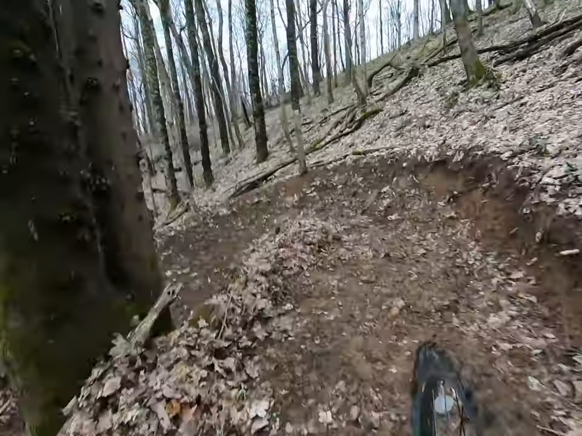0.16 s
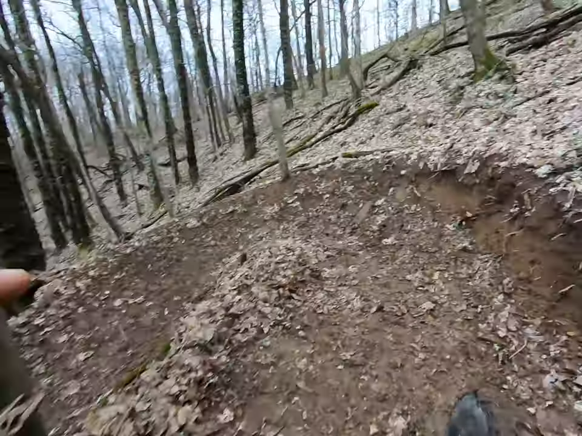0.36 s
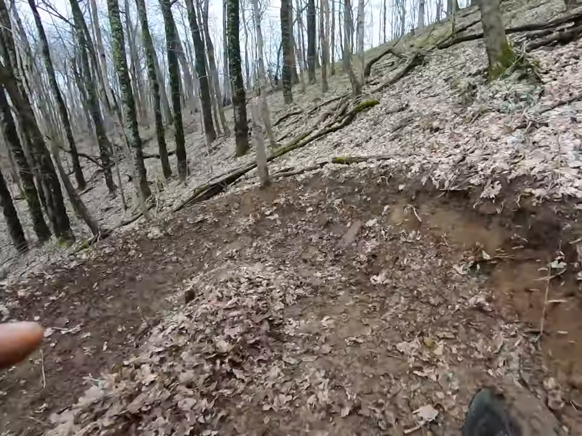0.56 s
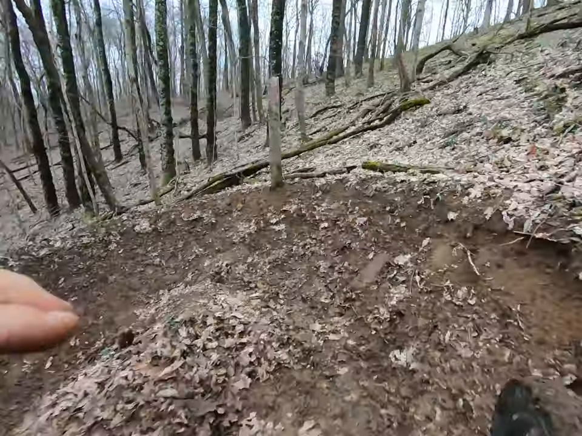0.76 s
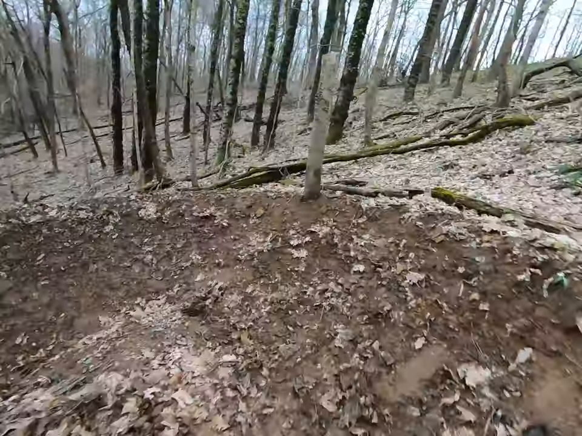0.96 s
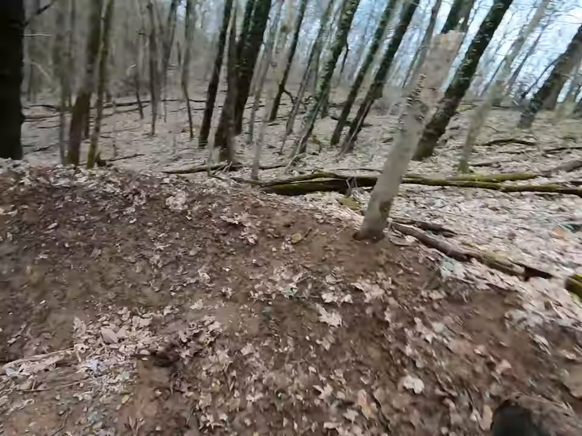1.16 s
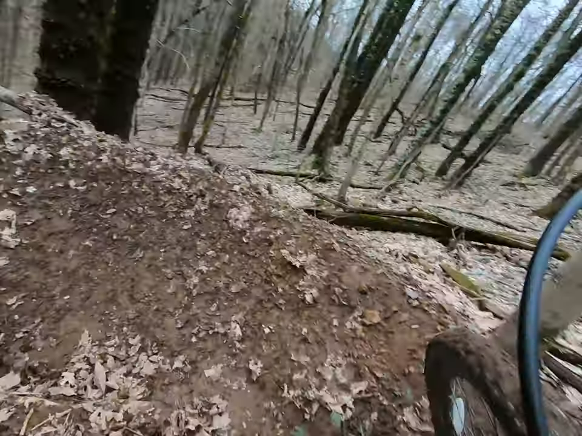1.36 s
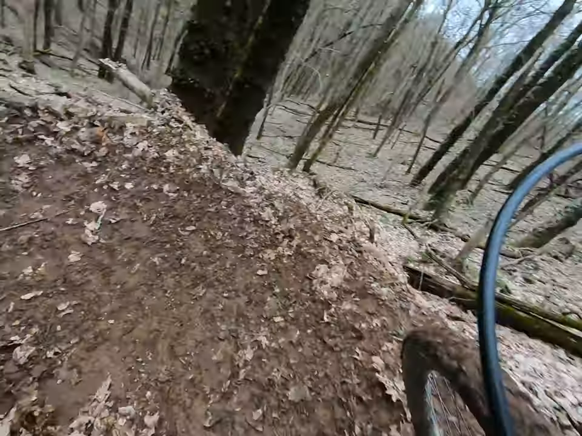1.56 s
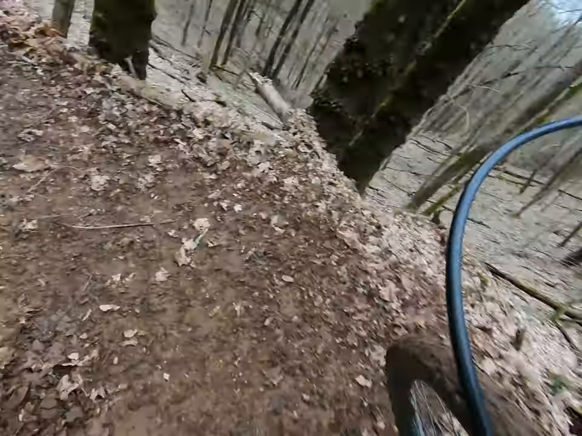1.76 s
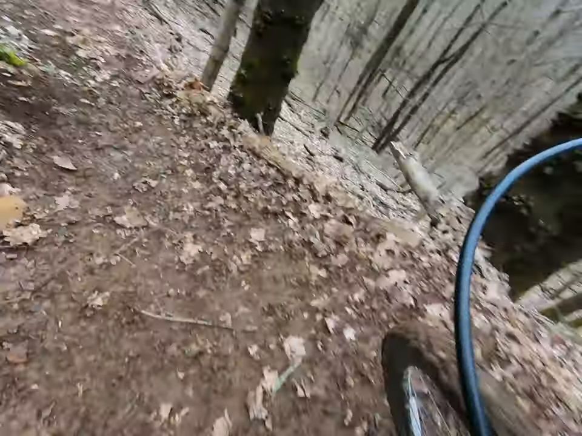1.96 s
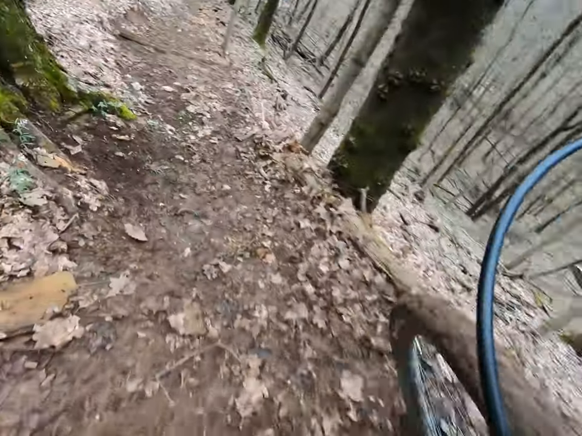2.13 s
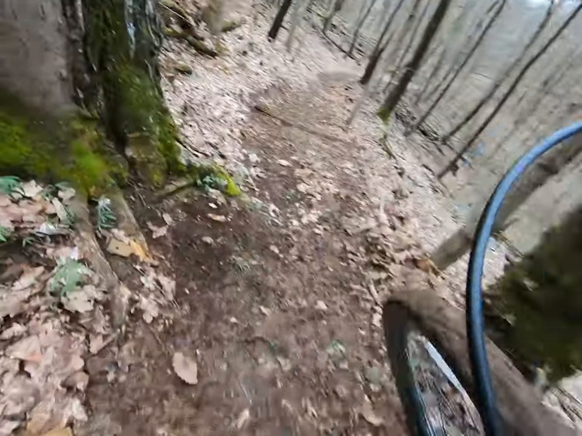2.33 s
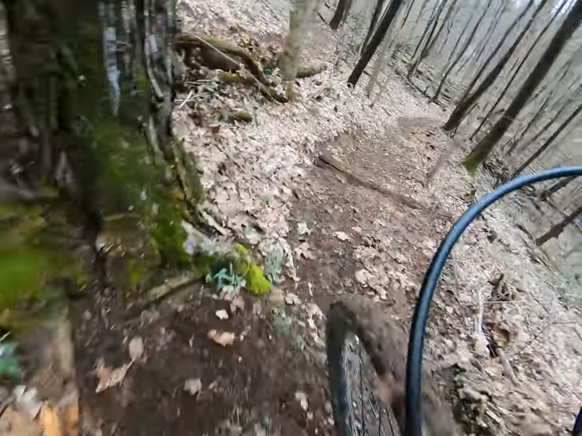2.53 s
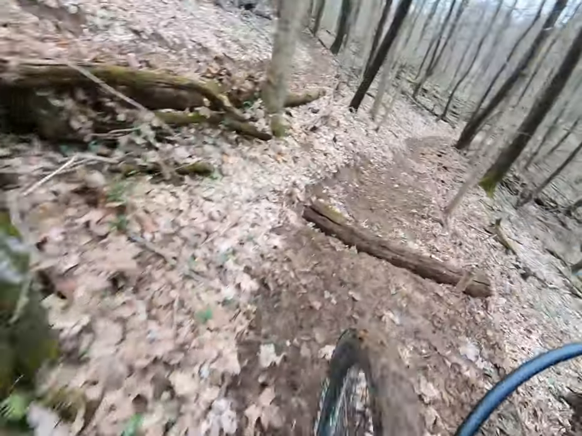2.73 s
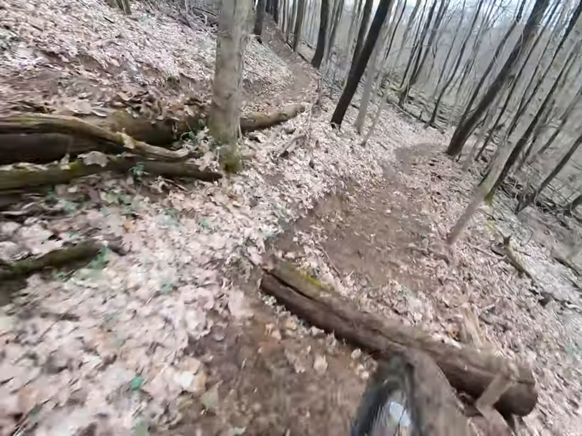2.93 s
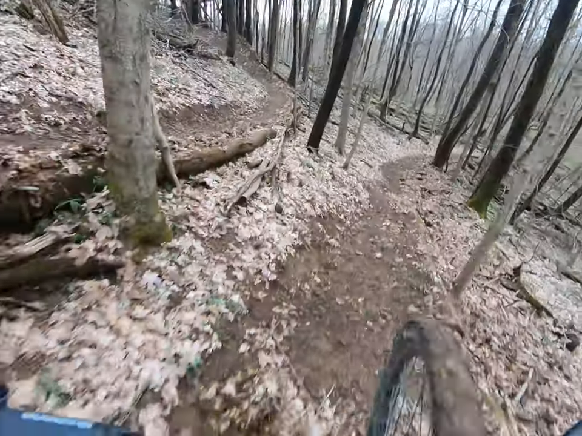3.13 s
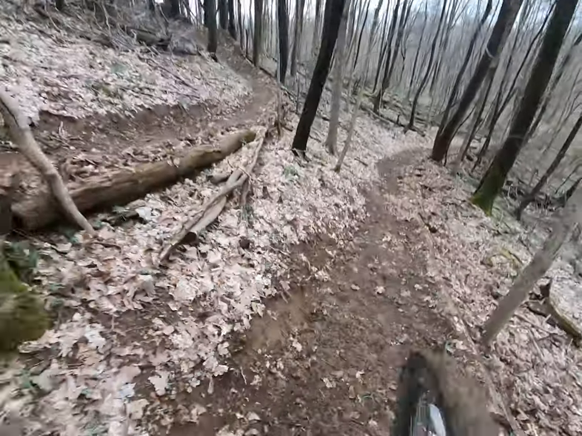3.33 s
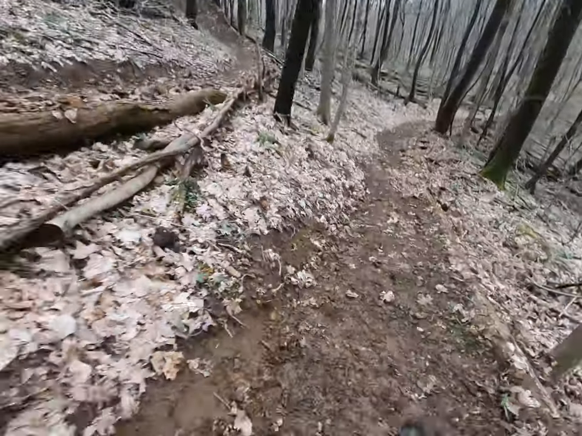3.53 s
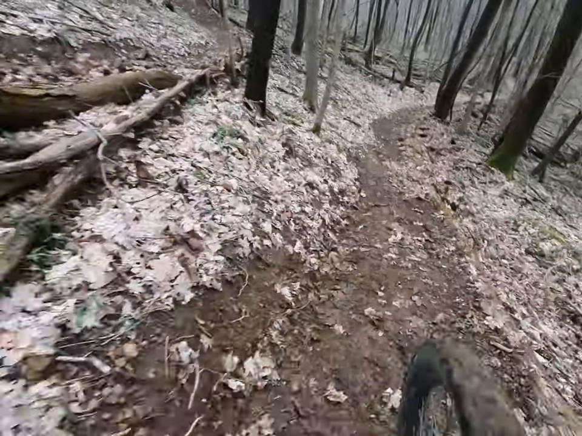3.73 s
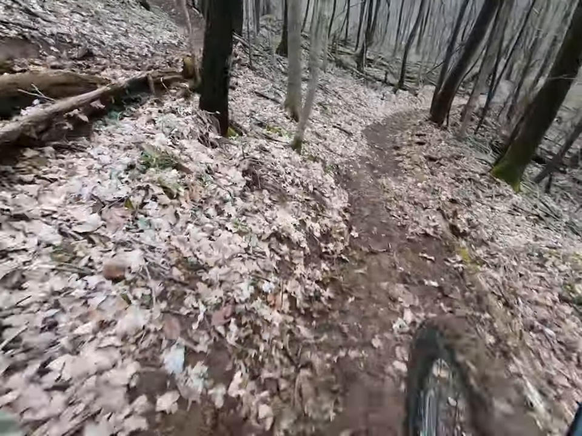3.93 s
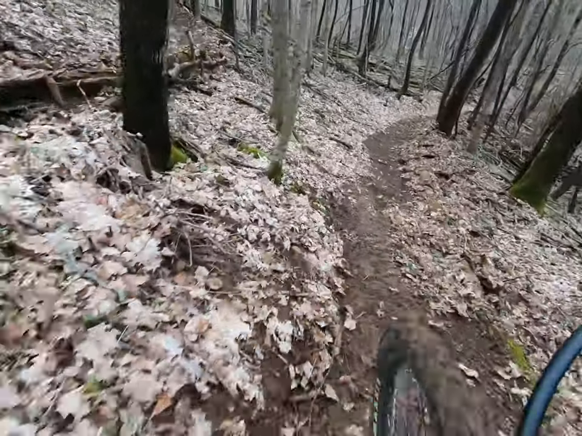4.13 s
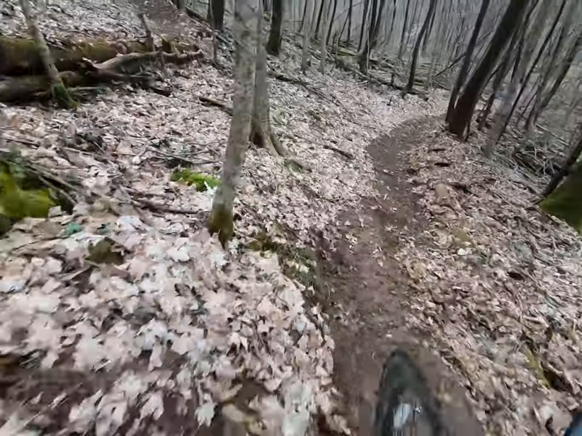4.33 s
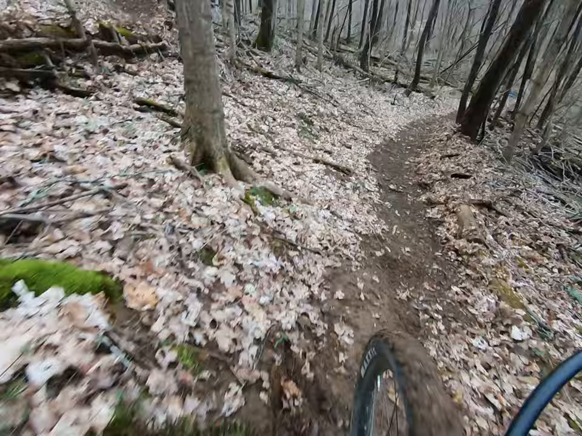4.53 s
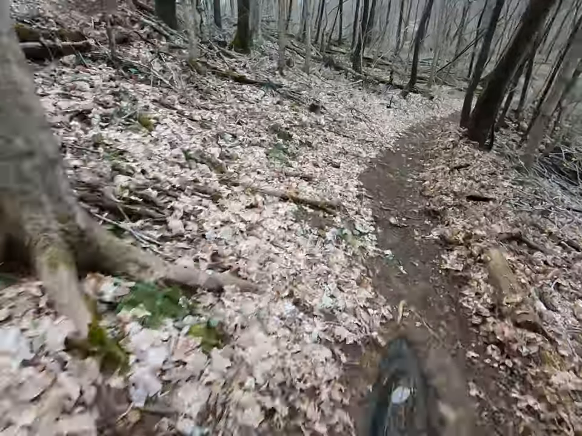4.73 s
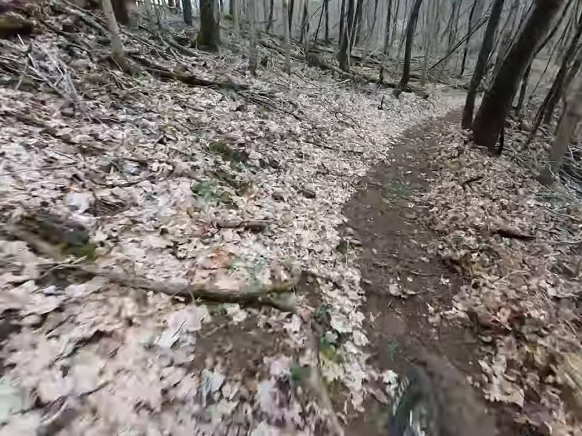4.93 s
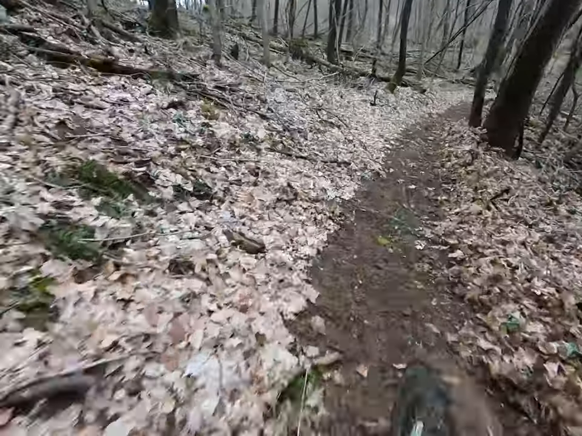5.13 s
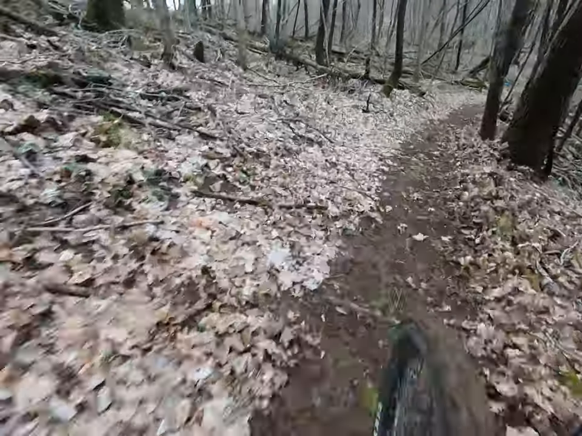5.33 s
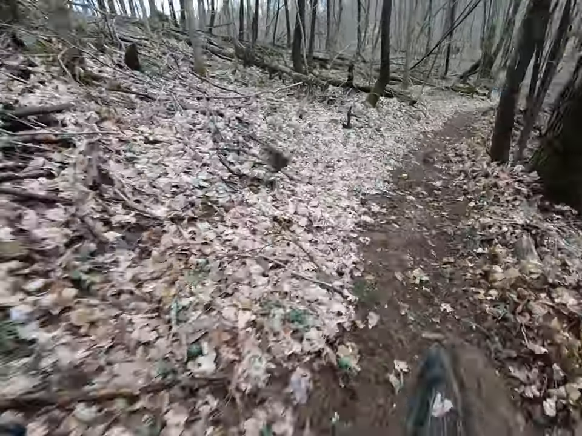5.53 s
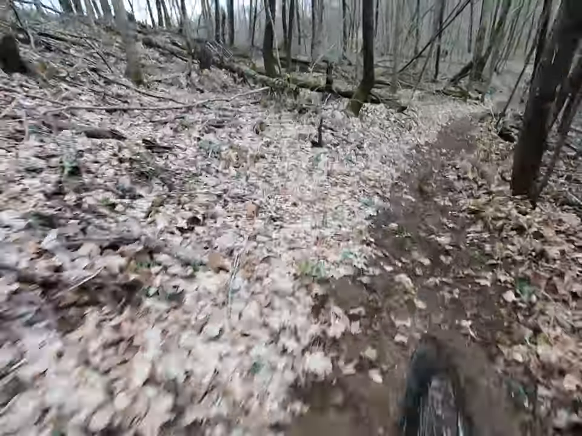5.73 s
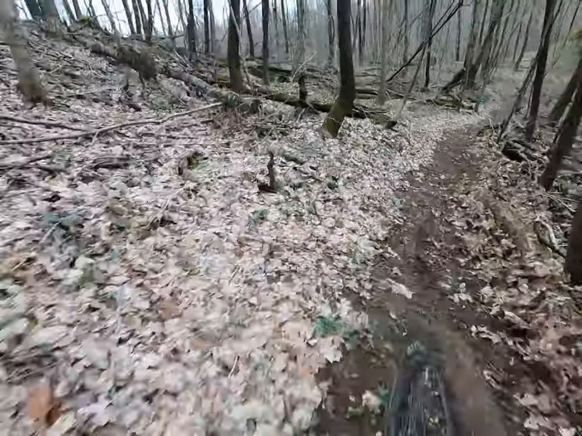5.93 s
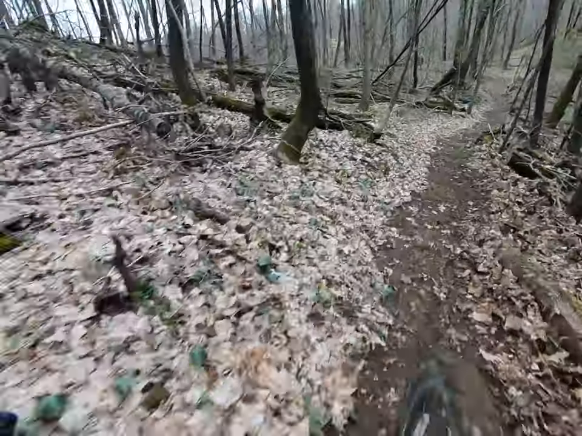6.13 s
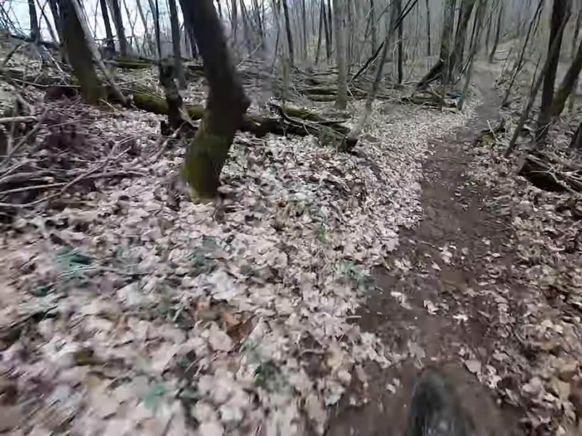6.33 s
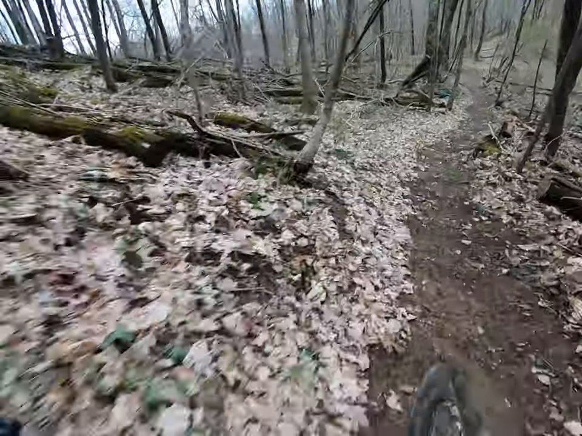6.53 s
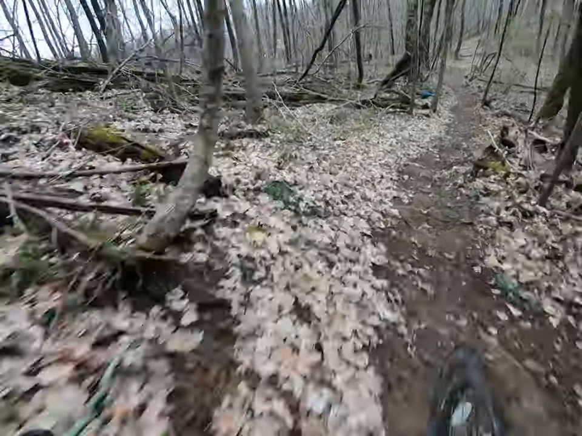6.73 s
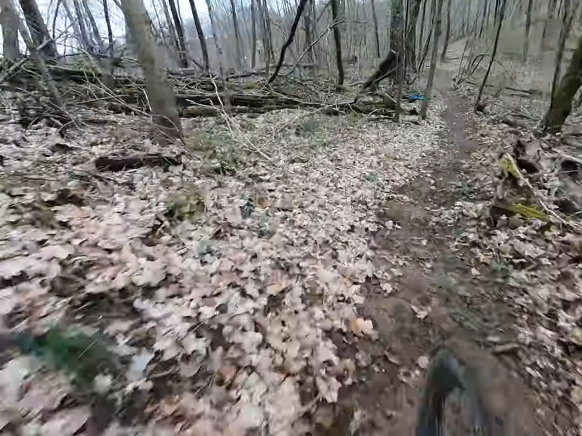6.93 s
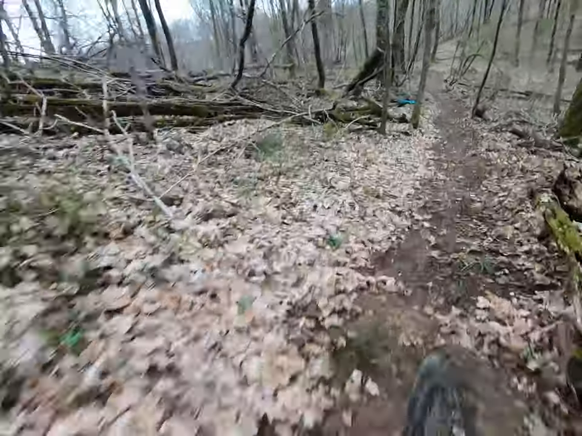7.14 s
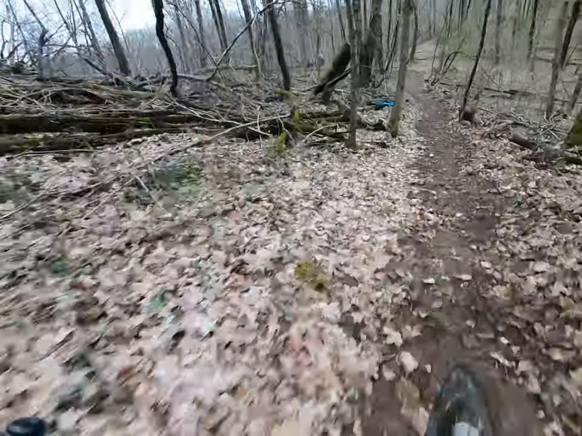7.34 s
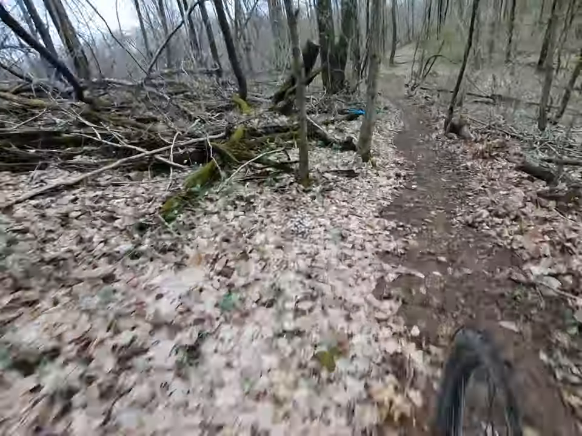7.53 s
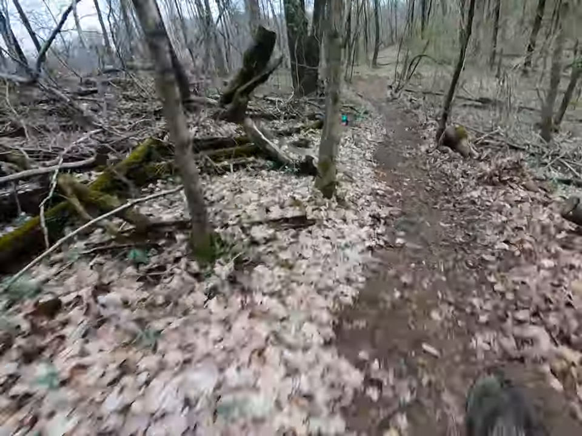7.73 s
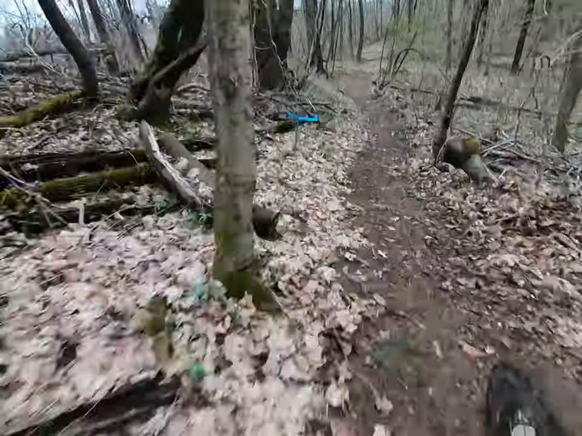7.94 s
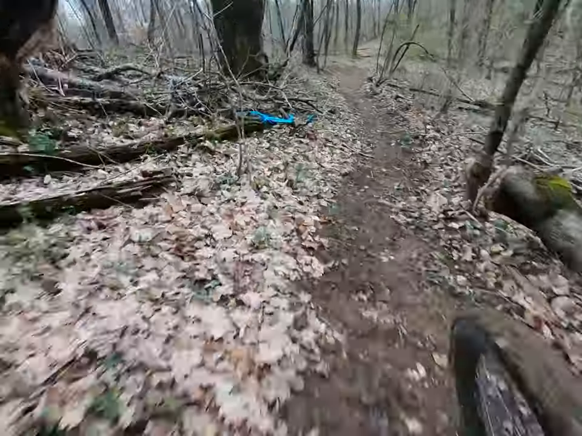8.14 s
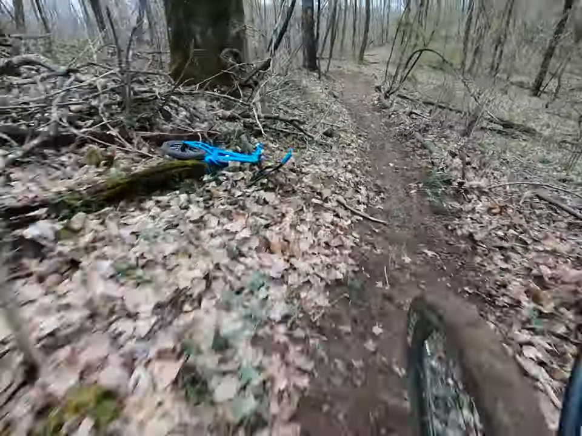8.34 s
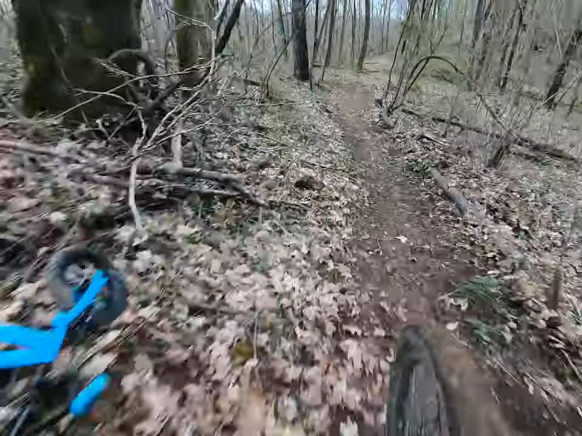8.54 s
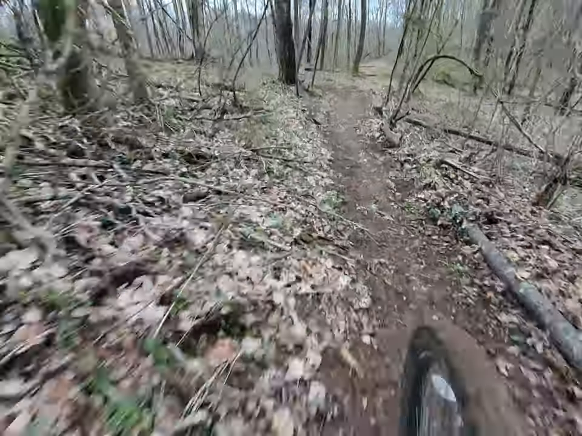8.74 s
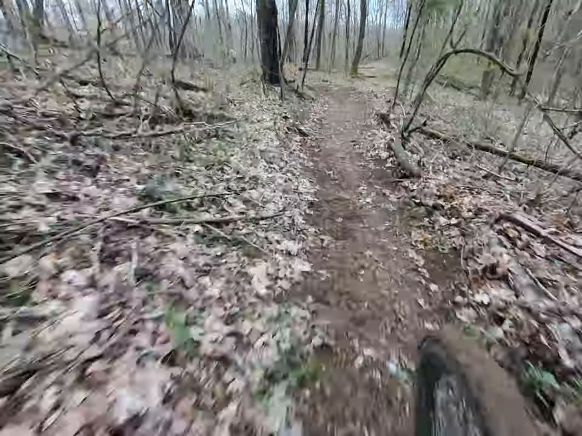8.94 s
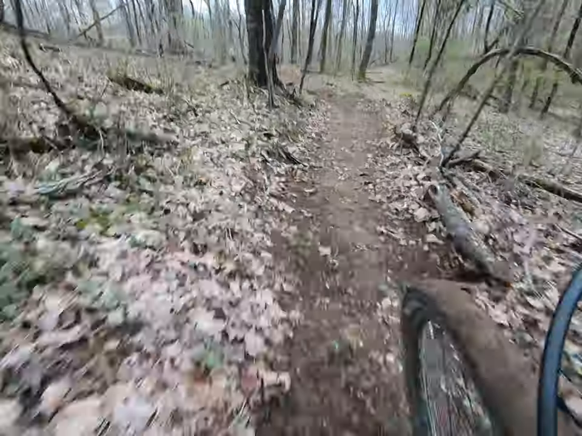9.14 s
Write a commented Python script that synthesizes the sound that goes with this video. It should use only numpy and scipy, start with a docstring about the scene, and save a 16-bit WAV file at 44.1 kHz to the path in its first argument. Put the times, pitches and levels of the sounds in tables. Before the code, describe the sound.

Low, gusty wind rumbles on a microphone carried by a mountain bike rider in open woods. The frame and chain clatter at an early landing, and the tyres hum and crunch through a turn with a few dull thumps. A short rasp over a log leads to a jump and a hard, rattling landing. Then the bike speeds up, with stronger wind, scrubbing dirt, crackling leaves and scattered knocks, all close and without echo.

```python
"""A mountain bike coasts down a leafy dirt trail, heard from a camera on the rider. It lands from a hop,
and impacts excite the modes of frame and chain. Through a banked turn the tyres drum and fracture soil
and leaves, while turbulence buffets the microphone. At 3.2 s a tyre rasps over a log; the bike takes
off, leaving mostly wind and freewheel, and lands from 3.6 s with a clatter that rings the brake disc.
On the faster straight the wind grows, stones clack and the tyres scrub the dirt."""
import sys
import numpy as np
from scipy import signal
from scipy.fft import rfft, irfft
from scipy.io import wavfile
from scipy.ndimage import uniform_filter1d

SR = 44100
rng = np.random.default_rng(int(sys.argv[2]) if len(sys.argv) > 2 else 0)


def pcm_store(signal):
    """Save signal as 16-bit PCM."""
    levels = np.round(np.clip(np.atleast_2d(signal), -1, 1) * 32767)
    wavfile.write(sys.argv[1], SR, levels.astype(np.int16).T)


N = 409248
TIME = np.arange(N) / SR


# Levels in all tables are relative: each source applies its own gain.
# riding speed: t/s, speed/speed on the straight
SPEED = [(0, 0.73), (1.5, 0.8), (2.6, 0.69), (3.6, 0.88), (4.6, 1.016), (6.0, 0.97), (7.0, 1.04),
         (8.2, 1.052), (9.28, 1.042)]
# gusts: t/s, duration/s, buffet level/dB, flutter level/dB, rush level/dB
GUSTS = [(1.915, 0.41, -26, -33, -49.5), (2.777, 0.14, -22.5, -25, -50), (2.924, 0.31, -22, -22.5, -36),
         (3.339, 0.02, -33, -26, -23.5), (5.022, 0.07, -19, -23, -36), (5.405, 0.78, -25.5, -48, -46),
         (6.68, 0.16, -24, -25, -44), (7.253, 0.025, -18, -22, -62), (7.448, 0.093, -35, -27, -35),
         (8.01, 0.54, -35, -28.5, -39), (8.608, 0.58, -38, -27, -51)]
# spectra of the low, middle and high bands of turbulence: f/Hz, level/dB
BUFFET = [(8, -2), (20, 1.5), (33, -2.5), (46, 6.5), (66, -1.5), (86, -0.5), (108, -7.5), (135, -19.5),
          (250, -68.5), (2000, -130)]
FLUTTER = [(70, -19.5), (115, 2.5), (155, 0), (220, -3.5), (290, -8.5), (360, -17), (500, -39),
           (1500, -110)]
RUSH = [(200, -13), (380, 4), (550, 0.5), (750, -4.5), (1000, -7.5), (1500, -13.5), (2500, -26.5),
        (5000, -43), (16000, -100)]
def wind():
    """Turbulent pressure grows as a power of speed, in gusts, and when an impact swings the camera."""
    speed, = curves(SPEED)
    start, length, *gust_db = np.transpose(GUSTS)
    gust_buffet, gust_flutter, gust_rush = [swells(start, length, db, 0.04, 0.061) for db in gust_db]
    start, length, *_, thump_db = np.transpose(IMPACTS)
    thump = swells(start, length, thump_db, 0.0092, 0.045)
    buffet = np.linalg.norm([from_db(-20) * speed ** 3.24, gust_buffet, thump], axis=0)
    flutter = np.linalg.norm([from_db(-27) * speed ** 3.48, gust_flutter, from_db(-8) * thump], axis=0)
    rush = np.linalg.norm([from_db(-39.5) * speed ** 3.04, gust_rush, from_db(-14) * thump], axis=0)
    flicker, surges = drift(15.8), from_db(drift(2.7))
    # eddies sweep past sooner at speed, so their rumble rises in pitch
    travelled = np.cumsum(1.17 * speed ** .9)
    eddies = colour(rng.standard_normal(2 * N), BUFFET)
    low = buffet * steady(np.interp(travelled, np.arange(2 * N), eddies), 0.055)
    middle = flutter * steady(colour(noise(), FLUTTER) * from_db(2 * flicker), 0.083)
    high = rush * steady(colour(noise(), RUSH) * from_db(3.16 * flicker), 0.21)
    bands = from_db(1.8 * flicker) * low + middle + from_db(-9 * airborne()) * high
    return surges * from_db(-1.5 * airborne()) * bands


# blows from roots and stones: t/s, frame level/dB, chain level/dB
KNOCKS = [(0.187, -26, -60), (0.209, -45, -28), (0.27, -36, -31), (0.281, -20.5, -27), (0.302, -21, -48),
          (0.319, -16.5, -38), (0.372, -17, -21.5), (0.409, -23.5, -25), (0.521, -31, -60),
          (0.587, -28.5, -32.5), (0.7243, -34, -38), (0.802, -29.5, -37.5), (0.893, -27.5, -39),
          (1.006, -28, -54), (2.485, -23, -35), (2.704, -30, -42), (2.979, -28.5, -34),
          (3.1494, -23.5, -31), (3.1678, -19.5, -30), (3.262, -24, -33), (3.631, -23.5, -23),
          (3.7097, -20.5, -29), (3.792, -20, -36), (3.814, -15, -19.5), (3.825, -22, -13.5),
          (3.8623, -33, -18), (3.882, -17, -36), (3.918, -15.5, -28), (3.9276, -17, -18), (4.354, -32, -31),
          (4.4232, -29.5, -24.5), (4.433, -30, -32), (4.539, -26.5, -33), (5.238, -24, -38),
          (5.4094, -22.5, -28), (5.435, -29, -27.5), (5.597, -24, -33), (5.7086, -24.5, -29),
          (5.74, -29, -45), (5.839, -27, -31), (5.877, -25, -34), (5.894, -27, -30), (5.919, -40, -36),
          (6.068, -38, -20.5), (6.109, -36, -28.5), (6.37, -26, -31), (6.4288, -28, -35),
          (6.674, -25.5, -32), (6.807, -28, -31), (6.8257, -27, -23), (6.973, -32, -31.5),
          (7.2102, -24.5, -28), (7.263, -31, -37), (7.344, -26.5, -33), (7.427, -24.5, -31.5),
          (7.743, -25.5, -28), (7.822, -20.5, -28), (9.208, -24, -36)]
# modes of frame and chain: f/Hz, bandwidth/Hz, level/dB
FRAME_MODES = [(1211, 64, -1.5), (1326, 64, -1.5), (1537, 120, -8), (1682, 170, -1.5), (2170, 180, -11)]
CHAIN_MODES = [(3125, 166, 4), (3667, 183, 6), (3865, 79, 5.5), (4130, 110, -1.5), (4600, 250, -3)]
# spectrum of a hard contact: f/Hz, level/dB
CRACK = [(200, -29), (400, 6), (700, 0.5), (1000, -5.5), (1250, 8.5), (2000, 4.5), (2800, 1), (4600, -10.5),
         (5300, -24.5), (8000, -25.5), (11000, -54.5), (15000, -68)]
def frame_and_chain(small_knocks_per_s=7.4):
    """Impulsive excitation: knocks and rattling ring the modes of frame and chain, over a broad crack."""
    s, frame_db, chain_db = np.transpose(KNOCKS)
    soil, _ = ground()
    small_knocks = soil * grains(small_knocks_per_s, 1.1)
    blows = strikes(s, frame_db) + from_db(5) * small_knocks
    slaps = strikes(s, chain_db) + from_db(4) * small_knocks
    rattle = loose_parts()
    frame = from_db(-5) * chatter(blows, 0.0026, 0.038, tail_db=-25, tail_t60=0.25)
    chain = from_db(1.5) * chatter(slaps, 0.0013, 0.013, tail_db=-23.5, tail_t60=0.072)
    # the first contact starts a clean ring; the chatter after it roughens that
    ringing = resonate(from_db(12.5) * blows + from_db(-2.5) * frame + from_db(-9) * rattle, FRAME_MODES)
    jingle = resonate(from_db(-2) * chain + from_db(-14) * rattle, CHAIN_MODES)
    hum = from_db(-15.5) * resonate(rattle, [(1226, 20, 1.5), (3696, 30, -4)])
    thin_ring = from_db(5.5) * resonate(slaps, [(3130, 11, 2), (3950, 18, 0)])
    crack = colour(from_db(-1) * frame + from_db(-6.5) * chain + from_db(-22) * rattle, CRACK)
    return ringing + jingle + hum + thin_ring + crack


# a wheel lands or rides over the log:
# t/s, duration/s, rattle level/dB, soil level/dB, leaf level/dB, air thump level/dB
IMPACTS = [(0.203, 0.029, -29.5, -49, -74, -29), (0.298, 0.075, -23, -43, -57, -21.5),
           (3.213, 0.058, -38, -34.5, -58, -26.5), (3.631, 0.051, -35, -36.5, -64, -23.5),
           (3.782, 0.15, -21, -40.5, -53, -21.5)]
def loose_parts(attack_s=0.011, release_s=0.0063, settle_s=0.092):
    """Repeated collisions: loose parts rattle during an impact, then settle faintly."""
    start, length, level_db, *_ = np.transpose(IMPACTS)
    settling = swells(start, length, level_db - 10, attack_s, settle_s) * (1 - airborne())
    shaking = np.maximum(swells(start, length, level_db, attack_s, release_s), settling)
    return shaking * steady(chatter(grains(240, 0.85), 0.00034, 0.009), 0.061)


# jolts through the suspension: t/s, boom level/dB, shudder level/dB
JOLTS = [(0.284, -21.5, -30), (0.527, -15.5, -34.5), (1.928, -17, -21), (2.03, -20, -19.5),
         (2.055, -12, -34), (2.181, -19.5, -21.5), (3.17, -15.5, -25), (3.823, -14, -24.5),
         (4.035, -14.5, -20.5), (6.364, -19, -46)]
# modes of the camera mount: f/Hz, bandwidth/Hz, level/dB
MOUNT_MODES = [(150, 5.9, -5), (210, 38, 6.5), (299, 41, 0.5)]
# spectrum of its shudder: f/Hz, level/dB
SHUDDER = [(60, -5), (105, 0), (150, 4), (230, 0.5), (300, -4.5), (370, -23), (1000, -53.5), (4000, -90.5)]
def jolts(hold_s=0.094):
    """Structure-borne sound: heavy bumps boom through the camera mount and leave it shuddering."""
    s, boom_db, shudder_db = np.transpose(JOLTS)
    boom = from_db(24.5) * resonate(strikes(s, boom_db), MOUNT_MODES)
    envelope = swells(s, np.full(len(s), hold_s), shudder_db, 0.025, 0.087)
    return boom + envelope * steady(colour(noise(), SHUDDER) * from_db(2 * drift(19)), 0.072)


# spectra of crushed soil and dry leaves: f/Hz, level/dB
SOIL = [(100, -18), (330, -12.5), (560, -2.5), (800, -16.5), (1080, -2.5), (1230, 6.5), (1500, 3.5),
        (2200, 2), (2800, -1.5), (3800, -2.5), (4200, -9.5), (4750, -10.5), (5250, -20), (16000, -100)]
LEAVES = [(2500, -32.5), (5200, -3.5), (6200, -4), (7200, 4), (8000, 4.5), (9200, -4), (10600, -5),
          (11600, -22), (14000, -45), (16000, -74.5)]
def tyres():
    """Brittle fracture: knobs crush soil and leaves under a varying load; small bumps tick the bike."""
    soil, leaves = ground()
    start, length, _, soil_db, leaves_db, _ = np.transpose(IMPACTS)
    soil = from_db(-1.67) * soil + swells(start, length, soil_db, 0.0089, 0.012)
    leaves = from_db(2.5) * leaves + swells(start, length, leaves_db, 0.0099, 0.02)
    load = from_db(2 * drift(25))
    # clods, stalks and leaves break one by one over the finer crunch and rustle
    crackles = rms_one(chatter(grains(55, 1.3), .002, .022, tail_db=-30, tail_t60=.04))
    crunch = colour(steady(grains(6000, 1.6) * noise(), .06) + .65 * crackles, SOIL)
    breaks = rms_one(chatter(grains(90, 1.8), .0005, .008, tail_db=-28, tail_t60=.03))
    rustle = colour(steady(grains(4000, 2) * noise(), .05) + .5 * breaks + .35 * crackles, LEAVES)
    rustle *= from_db(1.8 * drift(14))
    bumps = grains(70, 1)
    frame_ticks = resonate(chatter(bumps, .0005, 0.019, tail_db=-33), FRAME_MODES)
    chain_ticks = resonate(chatter(bumps, 0.00052, 0.008, tail_db=-13.5), CHAIN_MODES)
    ticks = rms_one(frame_ticks + from_db(-0.5) * chain_ticks)
    return load * (soil * (from_db(-1.5) * crunch + from_db(-6) * ticks) + from_db(-3) * leaves * rustle)


# rolling contact in the turn and on the straight: t/s, soil level/dB, leaf level/dB
TURN = [(0.55, -47, -76.5), (1.16, -46, -65), (1.34, -45.5, -67.5), (2.16, -46, -67.5), (3.05, -48, -71.5)]
STRAIGHT = [(4.1, -47, -70), (5.01, -44.5, -70), (5.63, -40, -62), (6.51, -42.5, -69), (7.03, -38.5, -62),
            (7.25, -41, -67), (8.67, -41.5, -68), (8.92, -41, -65.5), (9.28, -37.5, -63.5)]
def ground(flight_db=-10):
    """Rolling noise needs contact: the amplitudes of soil crunch and leaf rustle drop in flight."""
    return [from_db(db + flight_db * airborne()) for db in curves(np.vstack([TURN, STRAIGHT]))]


# both wheels off the ground: take-off t/s, landing t/s
FLIGHTS = [(-0.1, 0.183), (3.36, 3.631)]
def airborne(lift_s=0.033, touch_s=0.014):
    """Loss of contact, 1 in the air and 0 on the ground: tyres unload more slowly than they land."""
    return sum(np.clip(np.minimum((TIME - up) / lift_s, (down - TIME) / touch_s) + 1, 0, 1)
               for up, down in FLIGHTS)


# the tread pressed into the banked turn: t/s, duration/s, f/Hz, level/dB
DRUMS = [(0.954, 0.086, 64.6, -20), (1.496, 0.72, 74.8, -26), (2.296, 0.4, 71.7, -32)]
def tread(width_hz=2.5):
    """Narrow-band vibration: loaded knobs drum on hard soil with a low, wavering note."""
    return sum(swells([s], [length], [db], 0.022, 0.11)
               * steady(resonate(noise(), [(hz, width_hz, 0)]), 0.15) for s, length, hz, db in DRUMS)


# tyre growls: start t/s, end t/s, start f/Hz, end f/Hz, bandwidth/Hz, level/dB
GROWLS = [(0.55, 0.657, 217, 136, 22, -24), (2.034, 2.328, 249.6, 185.5, 22, -33)]
def growls():
    """Load-dependent pitch: the growl of a compressed tyre falls as it unloads."""
    return sum(glide(*row) for row in GROWLS)


# clean hits on tubes and small steel parts: t/s, f/Hz, level/dB, T60/s
RINGS = [(0.303, 1187, -22, .1), (0.373, 1220, -25.5, .16), (0.527, 1205, -30.5, 0.13),
         (3.827, 1280, -19, .06), (3.829, 3750, -23, 0.059), (3.884, 1247, -25, 0.084),
         (3.918, 1220, -16.5, 0.098), (3.929, 3880, -20, 0.044), (3.974, 1216, -25, 0.068),
         (4.007, 1233, -17.5, 0.069), (6.071, 3170, -23, 0.055), (6.676, 1215, -26, .06),
         (8.073, 2780, -25, 0.038)]
def rings(attack_s=0.0012):
    """Damped free vibration: one partial rings on, its level and phase modulated by the shaking."""
    out, wobble = np.zeros(N), .55 * drift(110)
    for s, hz, db, t60 in RINGS:
        span = slice(int(s * SR), int(s * SR) + SR // 2)
        age = TIME[span] - s
        envelope = from_db(db - 60 * age / t60) * (1 - np.exp(-age / attack_s))
        out[span] += envelope * np.sin(2 * np.pi * hz * age + wobble[span])
    return out * from_db(2.2 * drift(60))


# stones and sticks under the wheels: t/s, f/Hz, level/dB
CLACKS = [(0.241, 3500, -41), (0.354, 3800, -33), (1.062, 3500, -40), (2.544, 1200, -33.5),
          (2.576, 1730, -38.5), (3.12, 2180, -36), (3.659, 3780, -29.5), (4.613, 3760, -37.5),
          (4.678, 1310, -31.5), (5.006, 1660, -33.5), (5.321, 1550, -33.5), (5.562, 2170, -39),
          (5.685, 2190, -30), (5.863, 1930, -34), (6.03, 2100, -36), (6.521, 3190, -38.5),
          (6.886, 1750, -33), (6.971, 1400, -31), (7.1, 1450, -33.5), (7.279, 1590, -38),
          (7.689, 2194, -35), (8.038, 1290, -31.5), (8.614, 2160, -30.5), (9.012, 1720, -31.5)]
def clacks(relative_bandwidth=0.22, size=4096):
    """Heavily damped resonance: a struck stone or stick gives a dull crack and a short, hollow note."""
    notes, cracks = np.zeros((2, N + size))
    click = signal.unit_impulse(size, size // 4)
    for s, hz, db in CLACKS:
        burst = from_db(db) * chatter(click, 0.0016, 0.042, tail_db=-27, tail_t60=0.095)
        first = int(s * SR) - size // 4
        notes[first:first + size] += resonate(burst, [(hz, relative_bandwidth * hz, 0)])[:size]
        cracks[first:first + size] += burst
    hollow = colour(notes[:N], [(4000, -5.5), (4700, -2), (5400, -13.5), (16000, -35)])
    return from_db(-5.5) * hollow + from_db(-3) * colour(cracks[:N], CRACK)


# twigs breaking: t/s, level/dB
SNAPS = [(0.373, -34), (0.409, -40), (1.268, -41.5), (1.929, -40), (3.8344, -17.5), (3.8856, -29),
         (3.918, -30), (4.424, -35.5), (5.382, -33), (5.411, -32), (5.527, -30), (5.687, -34.5),
         (5.743, -31), (5.805, -37), (5.879, -34), (6.0688, -30), (6.8267, -30), (8.069, -35.5),
         (9.085, -29.5)]
# spectrum of a snap: f/Hz, level/dB
SNAP_SPECTRUM = [(1500, 1.5), (3500, 11.5), (5500, -2.5), (8300, -3), (10500, -11), (12000, -23.5),
                 (14000, -34), (16000, -50)]
def snaps(grit_per_s=4.3):
    """Short pulses have broad spectra: dry twigs and randomly flung grit give bright cracks."""
    s, level_db = np.transpose(SNAPS)
    _, leaves = ground()
    cracks = strikes(s, level_db) + from_db(19.5) * leaves * grains(grit_per_s, 1.6)
    return from_db(2.5) * colour(chatter(cracks, 0.0018, 0.013, tail_db=-9, tail_t60=0.11), SNAP_SPECTRUM)


# modes of a slipping tyre: f/Hz, bandwidth/Hz, level/dB
SCUFF_MODES = [(404, 49, -10.5), (1380, 340, -10.5), (2130, 150, -5.5), (3020, 1150, -18)]
def scuff(at_s=1.941, rise_s=0.0085, fall_s=0.0071, level_db=-13.5):
    """Frictional excitation: the tyre slips across a root with one short rasp."""
    swell = np.exp(-np.maximum((at_s - TIME) / rise_s, (TIME - at_s) / fall_s))
    rasp = resonate(grains(4000, 1.3) * noise(), SCUFF_MODES)
    dulled = signal.sosfilt(signal.butter(6, 4200, fs=SR, output="sos"), rasp)
    return from_db(level_db) * swell * steady(dulled, 0.016)


# spectrum of rubber on bark: f/Hz, level/dB
BARK = [(600, -16), (1400, 5.5), (3700, -5.5), (5200, -15.5), (7600, -17.5), (8700, -40), (14000, -58)]
def log_rasp(start_s=3.214, end_s=3.266, rise_s=0.021, stop_s=0.0053, level_db=-27):
    """Roughness noise: knobs tear across bark in a bright rasp that stops as the wheel lifts."""
    envelope = swells([start_s], [end_s - start_s], [level_db], rise_s, stop_s)
    return envelope * steady(colour(grains(1500, 1.8) * noise(), BARK), 0.011)


# sideways slides: t/s, duration/s, level/dB
SCRUBS = [(5.04, 0.06, -41.5), (7.84, 0.36, -43.5), (8.333, 0.38, -45)]
# spectrum of grinding dirt: f/Hz, level/dB
SCRUB_SPECTRUM = [(300, -23), (700, -1.5), (1400, 3), (2000, 0), (3000, -21), (5000, -32), (12000, -75)]
def scrubs():
    """Sliding friction: knobs grind loose dirt in a gritty swell."""
    start, length, level_db = np.transpose(SCRUBS)
    grit = steady(colour(grains(1500, 2.7) * noise(), SCRUB_SPECTRUM), 0.071)
    return swells(start, length, level_db, .03, 0.047) * grit


# puffs of air: t/s, level/dB
PUFFS = [(5.085, -27), (6.851, -27), (7.275, -28), (7.447, -25), (7.833, -26.5), (8.467, -25.5),
         (8.601, -27)]
def puffs(half_s=0.0178):
    """Transient flow noise: each puff crosses the microphone as a broad, falling whoosh."""
    return sum(glide(s - half_s, s + half_s, 1050, 532, 330, db - 6.5) for s, db in PUFFS)


# whistles around the jumps: start t/s, end t/s, start f/Hz, end f/Hz, bandwidth/Hz, level/dB
WHISTLES = [(0, 0.125, 817, 1224, 130, -46), (3.0, 3.421, 643, 1088, 220, -51)]
def whistles():
    """Edge tone: air sings over an edge, rising in pitch as the bike leaves the ground."""
    return sum(glide(*row) for row in WHISTLES)


# stones hitting spokes: t/s, f/Hz, level/dB
SPOKES = [(0.373, 7760, -42), (0.412, 7400, -45), (6.07, 7760, -44), (6.828, 8250, -45),
          (9.083, 8370, -33.5)]
def spokes(width_hz=260):
    """Resonance of a struck wire: a flung stone draws a thin, shimmering ping from a spoke."""
    return sum(resonate(chatter(strikes([s], [db]), 0.0024, 0.027, tail_db=-15, tail_t60=0.25),
                        [(hz, width_hz, 0)]) for s, hz, db in SPOKES)


# modes of the hollow frame: f/Hz, bandwidth/Hz, level/dB
TUBE_MODES = [(575, 47, 4), (1210, 60, 3), (2110, 200, -5)]
def frame_drone(level_db=-51.5, flight_db=-10):
    """Random forcing: the fine shaking of the trail keeps the tubes ringing, less so in flight."""
    drone = rms_one(resonate(grains(400, 1) * noise(), TUBE_MODES))
    return from_db(level_db + flight_db * airborne()) * drone


# partials of the brake disc: f/Hz, level/dB
DISC_PARTIALS = [(6640, -67), (6840, -70), (7480, -75), (8333, -68), (9351, -73), (9640, -73), (10218, -75)]
def brake_disc(at_s=3.835, t60=3.2, clang_db=13, clang_t60=0.27, width_hz=14):
    """Plate vibration with a two-stage decay: the steel disc clangs at the landing and shimmers on."""
    age = np.maximum(TIME - at_s, 0)
    fade = from_db(-60 * age / t60) + from_db(clang_db - 60 * age / clang_t60)
    partials = sum(from_db(db) * rough_tone(2 * np.pi * hz * age, width_hz) for hz, db in DISC_PARTIALS)
    return (age > 0) * fade * partials


# modes of the freewheel: f/Hz, bandwidth/Hz, level/dB
FREEWHEEL_MODES = [(2100, 2900, 5), (3160, 860, 8), (4100, 690, 4), (4800, 130, 8), (7000, 230, -0.5)]
def freewheel(clicks_per_s=340, flight_db=-62.5, grounded_db=-66.5):
    """A fast impulse train fuses into a tone: the pawls tick in a thin buzz, clearest in the air."""
    teeth = np.floor(np.cumsum(clicks_per_s * (1 + 0.028 * drift(3.5))) / SR)
    ticks = chatter(np.diff(teeth, prepend=0), .0001, 0.0072, tail_db=-40, tail_t60=.01)
    level_db = grounded_db + (flight_db - grounded_db) * airborne()
    return from_db(level_db) * rms_one(resonate(ticks, FREEWHEEL_MODES))


def from_db(db):
    """Amplitude ratio of a level in decibels."""
    return 10 ** (np.asarray(db) / 20)


def rms_one(x):
    """Normalisation to unit power."""
    return x / np.sqrt(np.mean(x ** 2) + 1e-20)


def steady(x, seconds):
    """Normalisation of the running power to 1."""
    return x / np.sqrt(np.abs(uniform_filter1d(x ** 2, int(seconds * SR))) + 1e-12)


def noise():
    """Gaussian white noise."""
    return rng.standard_normal(N)


def drift(corner_hz, hop=40):
    """Low-pass random fluctuation of unit power."""
    pole = np.exp(-2 * np.pi * hop * corner_hz / SR)
    slow = signal.lfilter([1], [1, -2 * pole, pole * pole], rng.standard_normal(N // hop + 2002))[2000:]
    return np.interp(np.arange(N) / hop, np.arange(len(slow)), rms_one(slow))


def rough_tone(phase, width_hz):
    """Random quadrature modulation widens a tone into a band."""
    return drift(width_hz) * np.cos(phase) + drift(width_hz) * np.sin(phase)


def glide(start, end, from_hz, to_hz, width_hz, level_db):
    """Linear frequency sweep of a rough tone that swells and fades."""
    phase = 2 * np.pi * np.cumsum(np.interp(TIME, [start, end], [from_hz, to_hz])) / SR
    swell = np.sqrt(np.abs(np.sin(np.pi * np.clip((TIME - start) / (end - start), 0, 1))))
    return from_db(level_db) * swell * rough_tone(phase, width_hz)


def colour(x, spectrum, size=16384):
    """Minimum-phase filter with the given spectrum and unit power gain."""
    hz, db = np.transpose(spectrum)
    grid = np.maximum(np.arange(size // 2 + 1) * SR / size, 1)
    cepstrum = irfft(np.log(from_db(np.interp(np.log(grid), np.log(hz), db))))
    response = irfft(np.exp(rfft(2 * cepstrum[:size // 2], size)))
    return signal.oaconvolve(x, response / np.linalg.norm(response))[:len(x)]


def resonate(x, modes, size=8192):
    """Superposition of damped modes, with unit power gain."""
    t = np.arange(size) / SR
    response = sum((-1) ** k * from_db(db) * width * np.exp(-np.pi * width * t)
                   * np.sin(2 * np.pi * hz * t) for k, (hz, width, db) in enumerate(modes))
    return signal.oaconvolve(x, response / np.linalg.norm(response))[:N]


def grains(per_s, spread_db):
    """Poisson impulses, a few larger than the rest."""
    sizes = from_db(spread_db * np.minimum(rng.exponential(1, N), 4))
    return sizes * (rng.random(N) < per_s / SR)


def strikes(times, levels_db):
    """One impulse for each blow."""
    clicks = np.zeros(N)
    clicks[np.clip(np.round(np.asarray(times) * SR).astype(int), 0, N - 1)] = from_db(levels_db)
    return clicks


def chatter(clicks, rise_s, t60, tail_db=-20, tail_t60=0.38, size=8192):
    """Contact chatter: each blow becomes a noise burst that builds, decays and leaves a weak tail."""
    t = (np.arange(size) - size // 8) / SR - rise_s
    age = np.maximum(t, 0)
    decay = from_db(-60 * age / t60) + from_db(tail_db - 60 * age / tail_t60)
    shape = np.exp(np.minimum(t, 0) / (1.51 * rise_s)) * decay
    power = signal.oaconvolve(clicks ** 2, (shape / shape.max()) ** 2)[size // 8:][:len(clicks)]
    return np.sqrt(np.abs(power)) * rng.standard_normal(len(clicks))


def curves(rows):
    """Linear interpolation in time of each column of a table."""
    s, *columns = np.transpose(rows)
    return [np.interp(TIME, s, column) for column in columns]


def swells(starts, lengths, levels_db, attack_s, release_s):
    """Incoherent addition: envelopes that rise, hold and decay are summed by power."""
    t, power = TIME[::20], 0
    for s, length, db in zip(starts, lengths, levels_db):
        fallen = np.maximum(np.maximum((s - t) / attack_s, (t - s - length) / release_s), 0)
        power = power + (from_db(db) * np.exp(-fallen)) ** 2
    return np.interp(TIME, t, np.sqrt(power))


def scene():
    """Free-field superposition: all sources are close by, with no echo from the open wood."""
    air = wind() + puffs() + whistles()
    trail = tyres() + tread() + growls() + scrubs() + clacks() + scuff() + log_rasp() + snaps()
    metal = frame_and_chain() + rings() + frame_drone() + brake_disc() + spokes() + freewheel()
    return (air + trail + metal + jolts())[None]


def record(dry, cutoff_hz=15400):
    """Band limiting: a steep low-pass filter cuts the highest treble."""
    return signal.sosfilt(signal.ellip(10, .1, 80, cutoff_hz, fs=SR, output="sos"), dry)


dry = scene()
out = record(dry)
pcm_store(out)
```